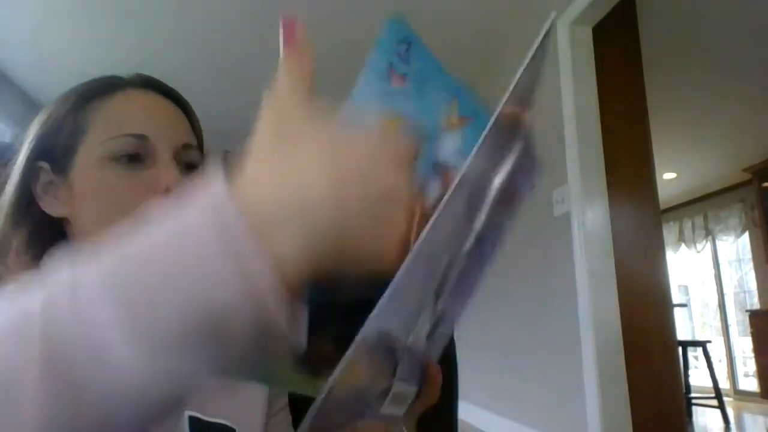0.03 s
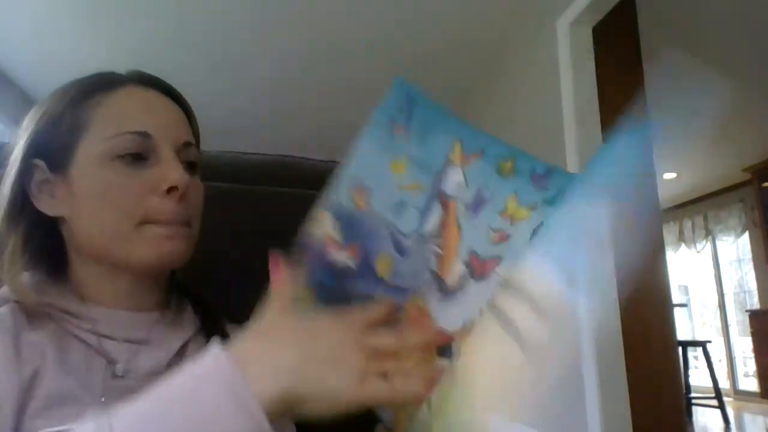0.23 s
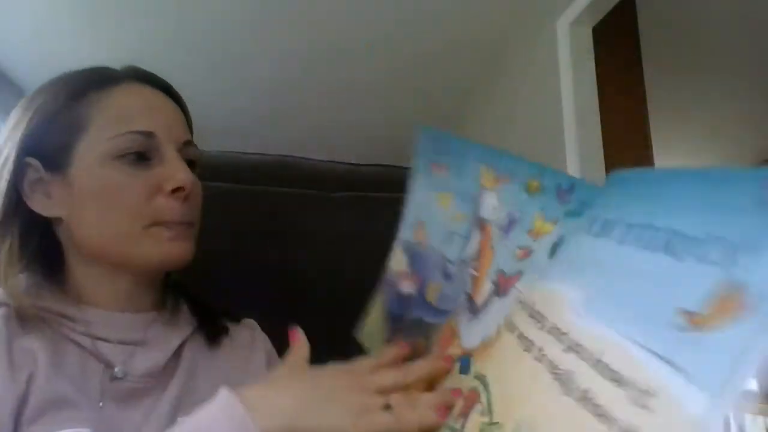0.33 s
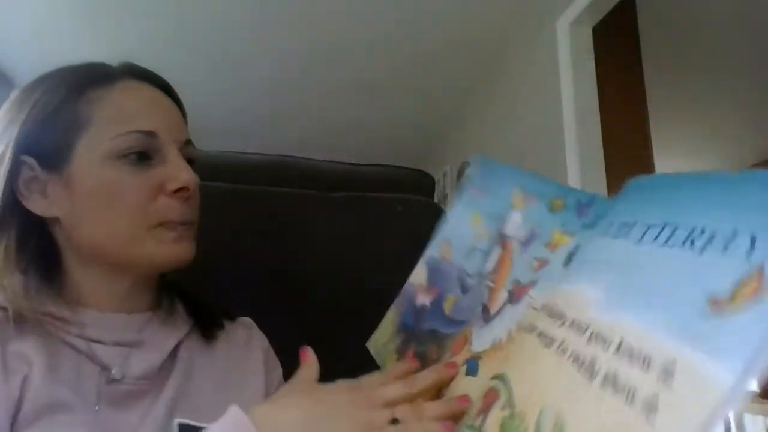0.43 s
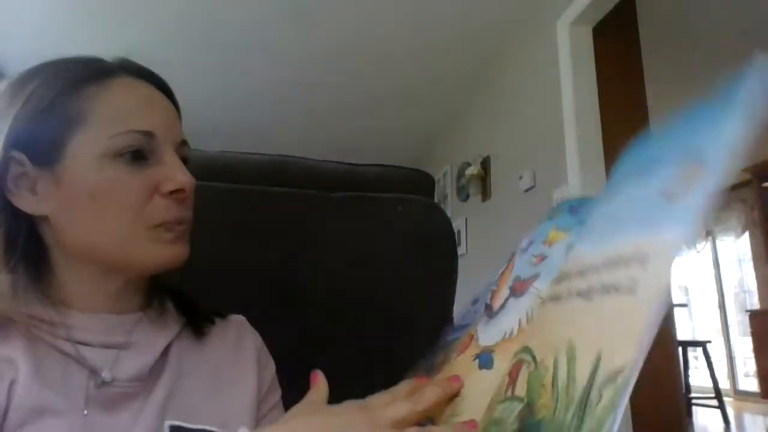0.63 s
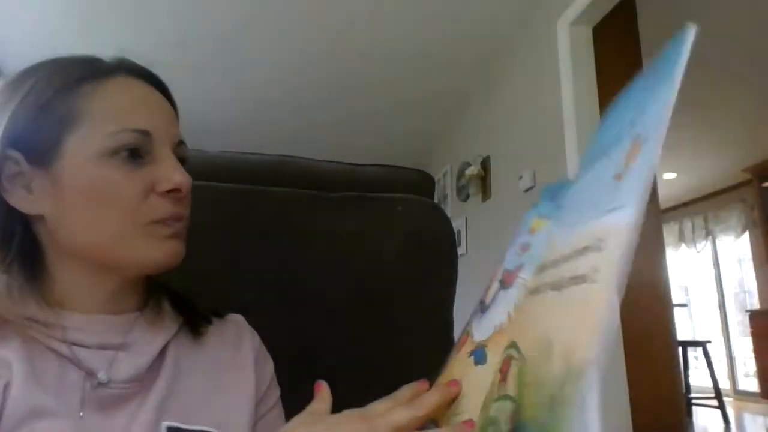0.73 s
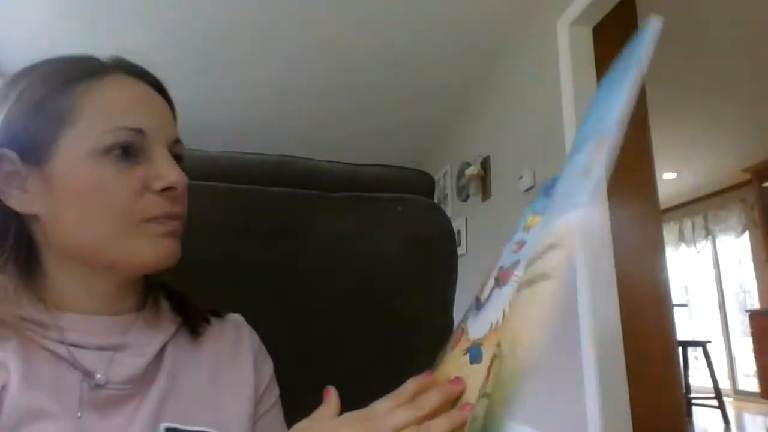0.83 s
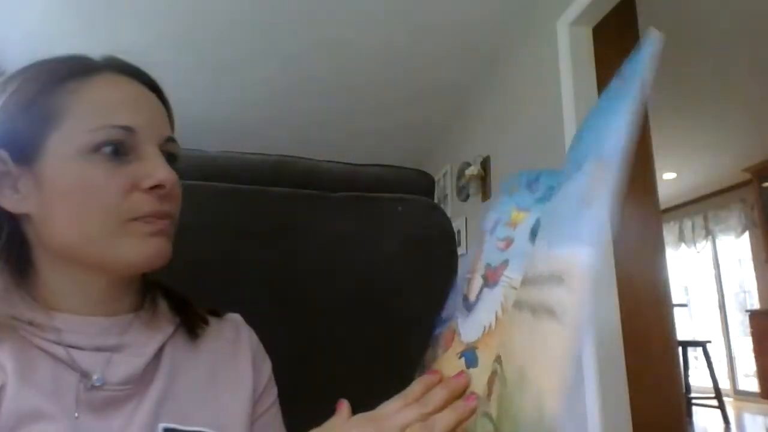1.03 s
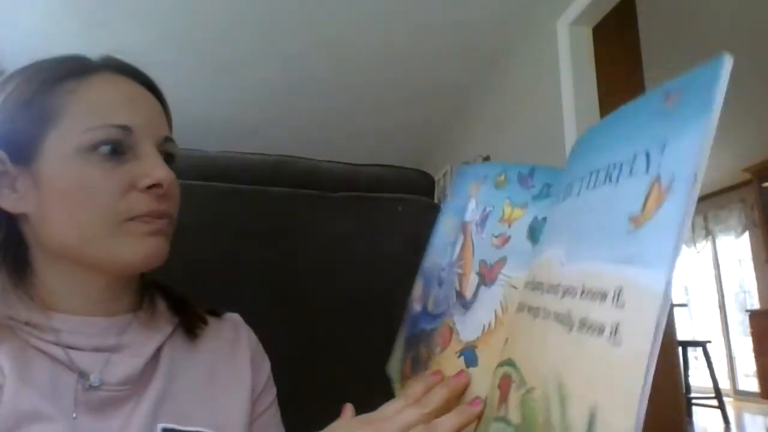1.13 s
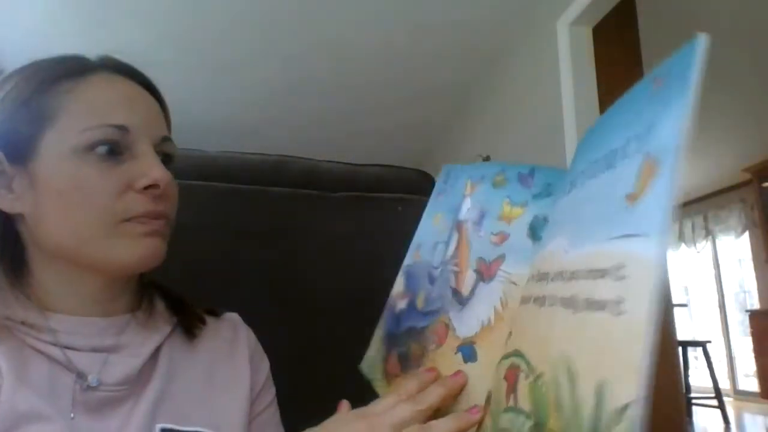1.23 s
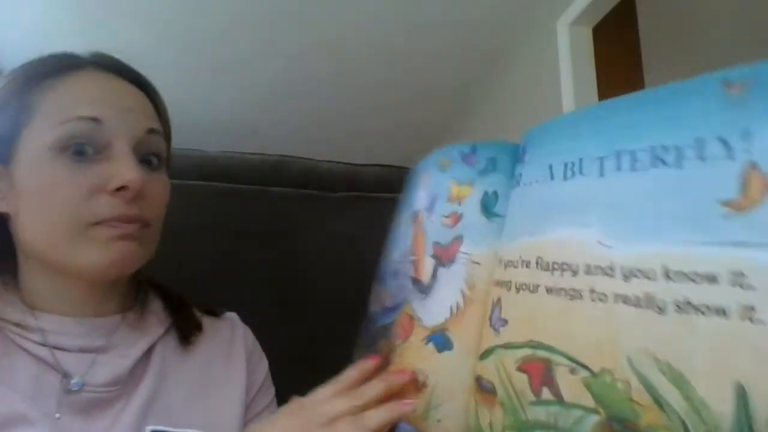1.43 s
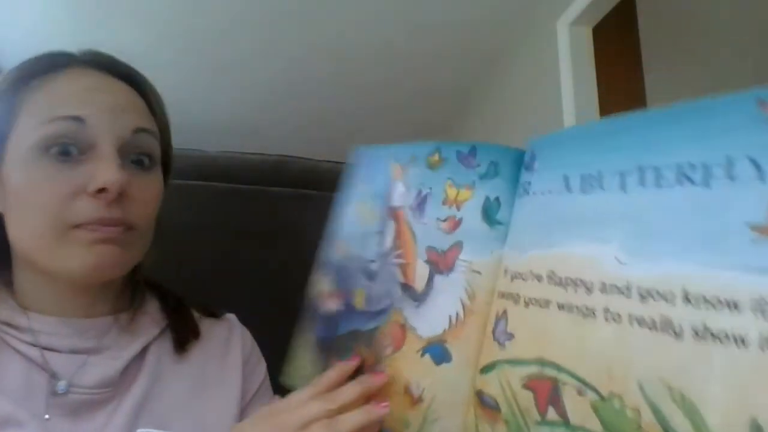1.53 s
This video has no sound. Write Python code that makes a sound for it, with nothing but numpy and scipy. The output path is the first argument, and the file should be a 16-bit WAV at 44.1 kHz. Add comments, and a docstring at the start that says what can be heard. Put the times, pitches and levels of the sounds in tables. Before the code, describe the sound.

A stiff glossy page is turned by hand, crinkling, buckling and snapping flat within half a second, then faint finger strokes on paper and one soft tap on the book, close in a quiet small room.

```python
"""A stiff glossy page bent over by hand rustles, buckles and snaps flat: gritty noise plus decaying rings.
The book itself then rings briefly, as two more such rings; a short room tail follows all of these.
Fingers slide over the paper in faint hissing strokes, made of streaky filtered noise.
The moving page pushes soft low puffs of air; one tap on the book excites blurred modes of its pages.
Low rumble and a faint floor lie beneath."""
import sys
import numpy as np
from scipy import signal
from scipy.fft import rfft, irfft, next_fast_len
from scipy.io import wavfile
from scipy.ndimage import uniform_filter1d, map_coordinates

SR = 44100
rng = np.random.default_rng(int(sys.argv[2]) if len(sys.argv) > 2 else 0)


def unload_wav(signal):
    """Save mono or channel-first audio to the path in sys.argv[1] as 16-bit WAV at rate SR, clipped to [-1, 1]."""
    wavfile.write(
        sys.argv[1],
        SR,
        np.round(np.clip(np.atleast_2d(signal).T, -1, 1) * 32767).astype(np.int16),
    )


def rack_gain(trim_db):
    """Turn a fader trim in dB into the linear factor to multiply a signal by."""
    fader = np.asarray(trim_db, float)
    return 10 ** (fader / 20)


N = 70560

# Flexing of the sheet: time_s, lower_range_db, upper_range_db
FLEX = [(0, -69.5, -64), (.008, -53, -67), (.022, -50, -57), (.03, -44.5, -60.5), (.055, -45.5, -59),
        (.066, -54.5, -53), (.088, -52.5, -53), (.094, -40, -49), (.13, -49.5, -50.5), (.143, -41, -50.5),
        (.165, -124, -49.5), (.185, -45.5, -57.5), (.208, -51, -50), (.218, -42, -46), (.255, -33.5, -39.5),
        (.29, -38, -37.5), (.33, -36, -41.5), (.352, -38.5, -41), (.365, -45.5, -42.5), (.42, -53.5, -49),
        (.434, -44, -41), (.46, -51.5, -49), (.5, -71, -60), (.57, -85.5, -74.5)]
# Bending sheet, lower range: freq_hz, relative_db_per_hz
LOW_SPECTRUM = [(60, -58.5), (150, -24.5), (350, -17.5), (550, -12.5), (750, -4), (960, -5), (1400, -7),
                (2200, -9.5), (2900, -36), (4800, -120)]
# Bending sheet, crisp upper range: freq_hz, relative_db_per_hz
HIGH_SPECTRUM = [(1180, -20), (2000, 0), (4460, -9), (4850, -13.5), (5260, -10.5), (7500, -22), (9750, -46),
                 (16500, -120)]
# Treble hiss of skin on paper: time_s, level_db (before HISS_GAIN_DB)
SLIDE = [(0.0, -71.5), (0.008, -51.5), (0.022, -56.5), (0.164, -47), (0.178, -57.5), (0.2, -60.5),
         (0.284, -41.5), (0.328, -41), (0.414, -54), (0.444, -39), (0.458, -59), (0.566, -67.5),
         (0.606, -52), (0.64, -51.5), (0.738, -65.5), (0.774, -74), (0.82, -57.5), (0.908, -73.5),
         (0.97, -65), (1.09, -82), (1.148, -83.5), (1.194, -60), (1.234, -56), (1.278, -60.5),
         (1.314, -55.5), (1.402, -72), (1.506, -56), (1.542, -52), (1.576, -58.5), (1.6, -55.5)]
# Skin hiss: freq_hz, relative_db_per_hz
HISS_SPECTRUM = [(2500, -27), (3500, -18.5), (3800, -12.5), (5700, -4.5), (7200, -7.5), (8500, -3.5),
                 (10500, -1.5), (16000, -4)]
# Strokes that sing in one band: start_s, rise_s, hold_s, fall_s, relative_db, centre_hz, width_hz (per pass)
STROKES = [(0.149, 0.012, 0.011, 0.014, -56, 3800, 700), (0.183, 0.013, 0.023, 0.026, -57, 5500, 800),
           (0.591, 0.043, 0.067, 0.16, -61.5, 2200, 444), (0.595, 0.042, 0.062, .09, -65, 2840, 706),
           (.59, 0.059, 0.026, 0.17, -62.5, 4550, 1800), (0.584, 0.022, 0.025, 0.028, -72.5, 840, 513),
           (.79, 0.021, 0.14, .05, -65.5, 4400, 700), (.8, .02, .04, .03, -72, 2710, 505),
           (.81, .02, 0.027, .03, -78, 1974, 291), (1.178, .03, 0.044, 0.055, -79, 2956, 495),
           (1.19, 0.051, .1, 0.027, -68, 5787, 898), (1.44, .04, 0.047, .06, -79.5, 2710, 400),
           (1.5, 0.033, .03, .03, -66.5, 5820, 1500), (1.57, .025, .02, .02, -60, 5403, 700)]
# Low rumble: time_s, rms_db
RUMBLE = [(0.0, -71.5), (0.236, -69), (0.31, -68), (0.436, -79), (0.588, -70.5), (0.966, -81),
          (1.158, -71.5), (1.318, -75.5), (1.6, -86)]
# Low rumble: freq_hz, relative_db_per_hz
RUMBLE_SPECTRUM = [(13, -38), (25, -9), (70, -2), (146, -13.5), (260, -16.5), (450, -22), (1100, -29),
                   (2000, -58)]
# Steady floor: freq_hz, relative_db_per_hz
FLOOR_SPECTRUM = [(150, -50), (250, -22), (421, -6), (1380, -13), (1760, -11), (16000, -28.5)]
# Decay of the room: freq_hz, t60_s
ROOM_DECAY = [(300, .22), (1500, 0.15), (6000, 0.067), (14000, .07)]
# Buckling of the sheet; the last two rows are the book ringing:
# start_s, relative_db, pitch_hz, cycles_to_minus_60_db, crack_share (0-1)
SNAPS = [(.008, -41.5, 2940, 3, .8), (.027, -37, 937, 26.5, .1), (.033, -35, 990, 13, .2),
         (.039, -33, 499, 21, .1), (.044, -31, 1500, 10, .3), (.054, -38, 900, 11, .2),
         (.091, -30, 1810, 13, .4), (0.107, -37, 920, 21, .1), (.125, -38, 900, 12, .2),
         (.142, -27, 1900, 14.5, .3), (.215, -33, 1380, 15.5, .1), (0.2304, -26, 1410, 23.5, .1),
         (0.2444, -24, 1440, 19.5, .2), (.248, -23.5, 1480, 22.5, 0.3), (.2585, -22, 3000, 16, .2),
         (0.2596, -16.5, 1430, 16, .3), (.274, -5, 1836, 10, 0.21), (0.2749, -20.5, 4590, 23.5, .4),
         (0.277, -10, 1500, 12, .4), (0.286, -22.5, 1592, 13, .2), (.32, -26, 1440, 20, .1),
         (0.342, -24, 1260, 20.5, .1), (.361, -28.5, 4360, 16, .3), (0.4295, -18, 3600, 24.5, 0.36),
         (.4295, -20, 1920, 12, 0.4), (0.4295, -24.5, 943, 9, 0), (0.434, -31, 1027, 2.5, 0.2),
         (.4492, -24, 783, 12.5, .1), (.462, -41.5, 797, 66, .05)]
# Wide crack at the edge of each ring: freq_hz, relative_db_per_hz
CRACK_SPECTRUM = [(200, -49), (500, -16), (900, -5), (1900, -1), (2800, -3.5), (3600, -0.5), (5000, -12),
                  (7000, -15.5), (12000, -42.5), (16000, -46)]
# Air pushed by page and book: peak_s, rms_db (at peak), half_length_s (to 1/e), centre_hz
PUFFS = [(0.154, -62.5, 0.06, 95), (.16, -64, .04, 185), (0.271, -51.5, 0.033, 190),
         (0.427, -63.5, 0.033, 180), (0.7, -62.5, 0.032, 70)]
# Tap on the book: start_s, level_db (each mode's level adds to it)
TAP = [(.9325, -47)]
# Blurred modes of the closed pages: freq_hz, width_hz (per pass), relative_db, t60_s
BOOK_MODES = [(219, 155, -10, 0.18), (497, 220, -8, 0.17), (855, 260, -3.5, 0.23), (1380, 320, 2, 0.24),
              (2200, 560, -9.5, .14), (2810, 350, -16.5, 0.23)]

CREASES_PER_S, CREASE_SPREAD_DB, CREASE_SHARE = 830, 2, 0.54
STREAK_DB, HISS_GAIN_DB = 3.5, 1
FLOOR_DB, ROOM_DB = -82.5, -13.5
CRACK_T60_S, SNAP_GAIN_DB = 0.008, 0.5
SAG_PER_S = 2.5  # fractional pitch fall of a ring as the paper relaxes
SMALL_HZ = 344  # a small patch of paper radiates little below this
PUFF_WIDTH = 0.34  # width over centre, per pass
TAP_ATTACK_S = 0.00072
NOTCH_HZ, NOTCH_HALF_WIDTH_HZ, NOTCH_DB = 7664, 260, -11


def unit(x):
    """Scaled to rms 1."""
    return x / np.sqrt(np.mean(x ** 2) + 1e-20)


def along(points, hz):
    """(Hz, value) points interpolated on a log frequency axis."""
    f, v = np.transpose(points)
    return np.interp(np.log(hz + 1), np.log(f + 1), v)


def curves(rows):
    """One value per sample for each column after the time."""
    s, *cols = np.transpose(rows)
    return [np.interp(np.arange(N) / SR, s, c) for c in cols]


def wobble(knots_per_s):
    """Smooth random curve through normally distributed knots."""
    knots = rng.standard_normal(int(N * knots_per_s / SR) + 4)
    return map_coordinates(knots, [np.arange(N) * knots_per_s / SR])


def filtered(x, response):
    """x through a complex response of frequency."""
    size = next_fast_len(len(x) + 8192)
    return irfft(rfft(x, size) * response(np.fft.rfftfreq(size, 1 / SR)), size)[:len(x)]


def coloured(x, spectrum):
    """x through a (Hz, dB) spectrum, rms 1."""
    return unit(filtered(x, lambda hz: rack_gain(along(spectrum, hz))))


def peak(f, hz, width_hz):
    """Response of one causal resonance."""
    return 1j * f * width_hz / (hz * hz - f * f + 1j * f * width_hz + 1e-9)


def gritty(per_s, spread_db, share):
    """Noise mixed with a share of scattered clicks of uneven size."""
    size = rack_gain(spread_db * np.clip(rng.standard_normal(N), -2, 2))
    clicks = (rng.random(N) < per_s / SR) * rng.choice([-1, 1], N) * size
    share = np.clip(share, 0, 1)
    return share * unit(clicks) + (1 - share) * rng.standard_normal(N)


def streaky(x, depth_db):
    """Random gain in narrow, short-lived bands, rms 1."""
    z = signal.stft(x, nperseg=512)[2]
    field = uniform_filter1d(rng.standard_normal(z.shape), size=2, axis=0)  # over frequency
    field = uniform_filter1d(field, size=7, axis=1)  # over time
    return unit(signal.istft(z * rack_gain(depth_db * unit(field)), nperseg=512)[1][:N])


def rustle():
    """Countless small creases in clumps excite the bending sheet."""
    lower_db, upper_db = curves(FLEX)
    flexing = np.arange(N) / SR < FLEX[-1][0]
    clumps_db = 2.5 * wobble(150)
    creases = gritty(CREASES_PER_S, CREASE_SPREAD_DB, CREASE_SHARE)
    low = coloured(creases, LOW_SPECTRUM) * rack_gain(lower_db + clumps_db)
    crisp = streaky(coloured(gritty(3300, 4, 0.5), HIGH_SPECTRUM), STREAK_DB)
    high = crisp * rack_gain(upper_db + 0.6 * clumps_db)
    return flexing * (low + high)


def fingers():
    """Skin on glossy paper: a fine gritty hiss, and strokes that sing in a band."""
    level_db, = curves(SLIDE)
    hiss = streaky(coloured(gritty(6600, 3.5, 0.57), HISS_SPECTRUM), STREAK_DB)
    out = hiss * rack_gain(level_db + HISS_GAIN_DB + 0.99 * wobble(90))
    t = np.arange(N) / SR
    for start_s, rise_s, hold_s, fall_s, db, hz, width_hz in STROKES:
        corners_s = np.cumsum([start_s, rise_s, hold_s, fall_s])
        shape_db = np.interp(t, corners_s, [-8.5, 3, -1.5, -19], -90, -90)
        band = filtered(rng.standard_normal(N), lambda f: peak(f, hz, width_hz) ** 2)
        out += streaky(band, STREAK_DB) * rack_gain(db + shape_db + 2.47 * wobble(60.57))
    return out


def background():
    """Shaped noise: a varying low rumble and a faint steady floor."""
    rumble_db, = curves(RUMBLE)
    rumble = rack_gain(rumble_db) * coloured(rng.standard_normal(N), RUMBLE_SPECTRUM)
    floor = rack_gain(FLOOR_DB) * coloured(rng.standard_normal(N), FLOOR_SPECTRUM)
    return rumble + floor


def walls(x):
    """Room answer: delayed noise tail whose frequencies each die at their own speed."""
    hz, t, z = signal.stft(rng.standard_normal(SR // 2), SR, nperseg=256)
    decay = rack_gain(-60 * t / along(ROOM_DECAY, hz)[:, None])
    tail = signal.istft(z * decay, SR, nperseg=256)[1]
    delayed = np.pad(x, (120, 0))  # samples
    return signal.fftconvolve(delayed, tail / np.linalg.norm(tail))[:N]


def snaps():
    """Each buckle, and lastly the book, rings at its own sagging pitch, with a wide crack at the edge."""
    out, t = np.zeros(N), np.arange(SR // 10) / SR
    for start_s, db, hz, cycles, crack in SNAPS:
        near_hz = hz * np.exp(rng.normal(0, 0.12, (2, 1)))
        swell = rack_gain(-60 * t * hz / cycles) * (1 - np.exp(-t * hz / 0.83))
        main = np.sin(2 * np.pi * hz * t * (1 - SAG_PER_S * t / 2))
        neighbours = np.sin(2 * np.pi * near_hz * t).sum(0)  # these hold their pitch
        ring = swell * (main + 0.4 * neighbours)
        edge = coloured(rng.standard_normal(len(t)), CRACK_SPECTRUM) * rack_gain(-60 * t / CRACK_T60_S)
        snap = 1.62 * (1 - crack) * ring + 1.2 * abs(crack) * edge
        out[round(start_s * SR):][:len(t)] += rack_gain(db + SNAP_GAIN_DB) * snap
    return out


def puffs():
    """The swinging page and book push soft low puffs of air: band noise under bell-shaped swells."""
    out, t = np.zeros(N), np.arange(N) / SR
    for peak_s, db, half_length_s, hz in PUFFS:
        band = unit(filtered(rng.standard_normal(N), lambda f: peak(f, hz, PUFF_WIDTH * hz) ** 2))
        out += rack_gain(db) * np.exp(-((t - peak_s) / half_length_s) ** 2) * band
    return out


def tap():
    """A tap on the book: blurred modes start together and each fades at its own speed."""
    out, t = np.zeros(N), np.arange(SR // 3) / SR
    attack = 1 - np.exp(-t / TAP_ATTACK_S)
    for start_s, level_db in TAP:
        for hz, width_hz, db, t60_s in BOOK_MODES:
            mode = unit(filtered(rng.standard_normal(len(t)), lambda f: peak(f, hz, width_hz) ** 2))
            fade = rack_gain(level_db + db - 60 * t / t60_s)
            out[round(start_s * SR):][:len(t)] += fade * attack * mode
    return out


def scene():
    """Page and book rings with their room tail, then puffs, tap, fingers and background."""
    radiation = lambda f: (1j * f / (SMALL_HZ + 1j * f)) ** 2
    paper = rustle() + filtered(snaps(), radiation)
    room = rack_gain(ROOM_DB) * walls(paper)
    return (paper + room + puffs() + tap() + fingers() + background())[None]


def roll_off(x):
    """The treble ends steeply here."""
    return signal.sosfilt(signal.butter(12, 16380, fs=SR, output="sos"), x)


def record(dry):
    """Microphone with a narrow dip in its response."""
    dip = lambda f: rack_gain(NOTCH_DB * np.exp(-((f - NOTCH_HZ) / NOTCH_HALF_WIDTH_HZ) ** 2))
    mix = filtered(dry[0], dip)[None]
    return roll_off(mix)


dry = scene()
out = record(dry)
unload_wav(out)
```